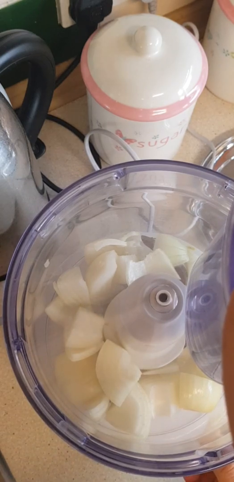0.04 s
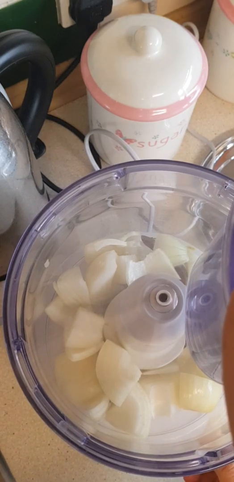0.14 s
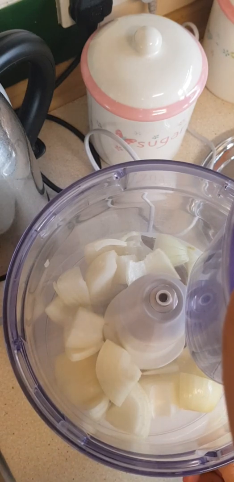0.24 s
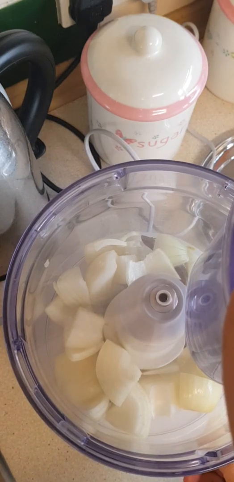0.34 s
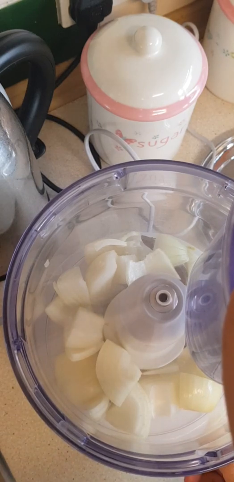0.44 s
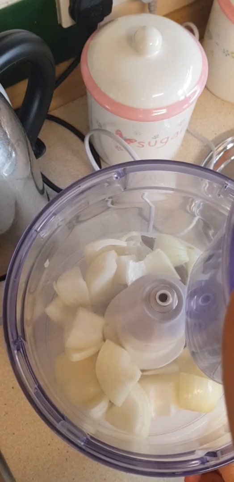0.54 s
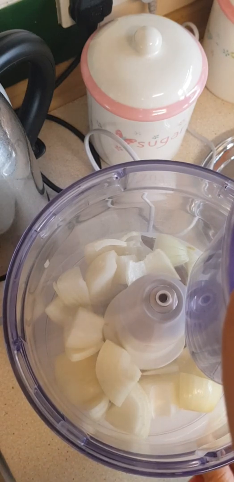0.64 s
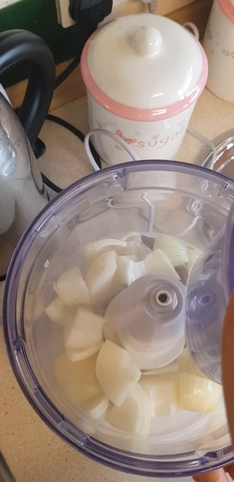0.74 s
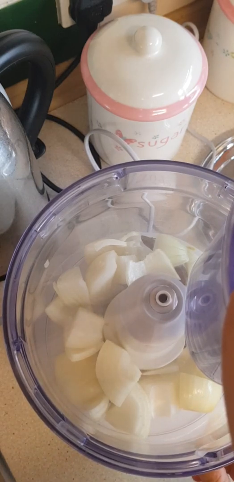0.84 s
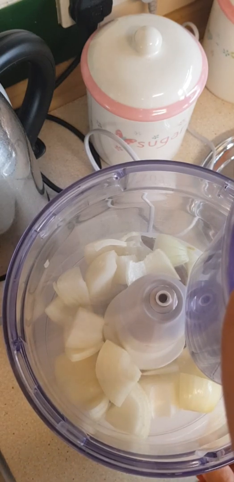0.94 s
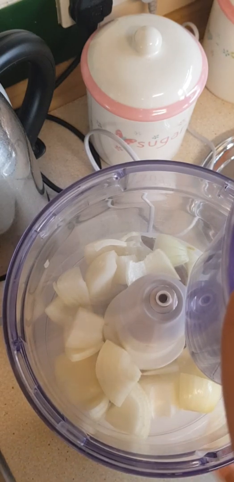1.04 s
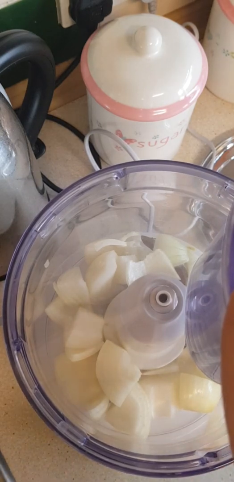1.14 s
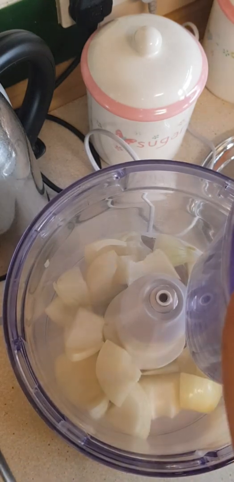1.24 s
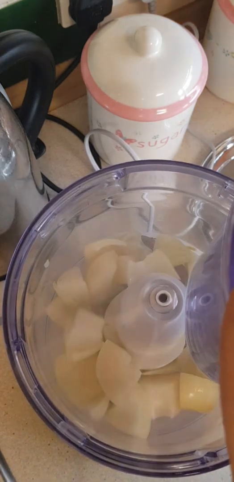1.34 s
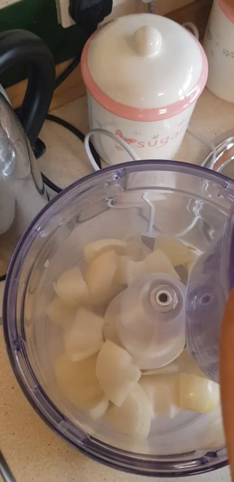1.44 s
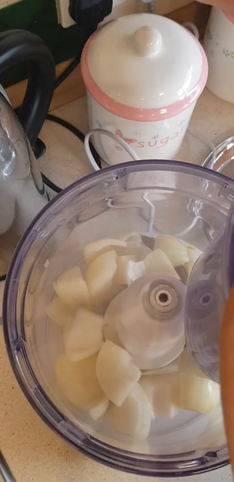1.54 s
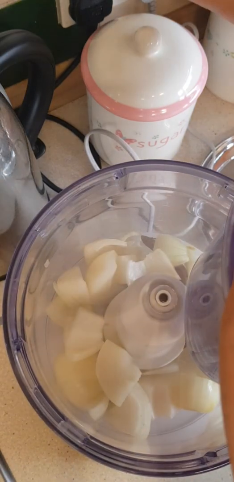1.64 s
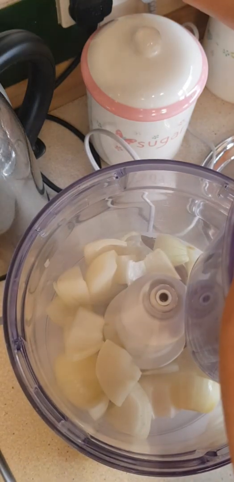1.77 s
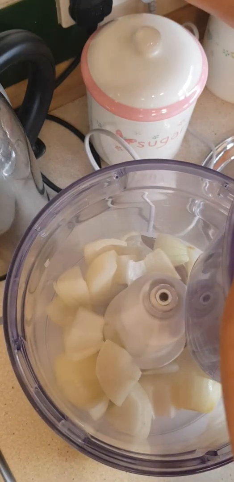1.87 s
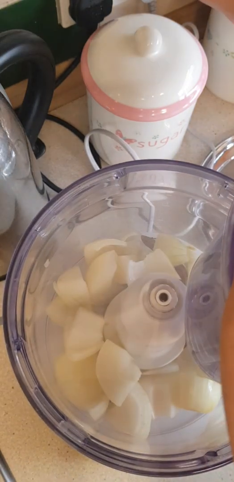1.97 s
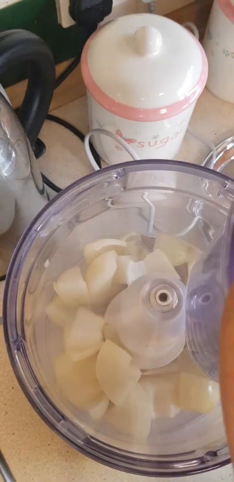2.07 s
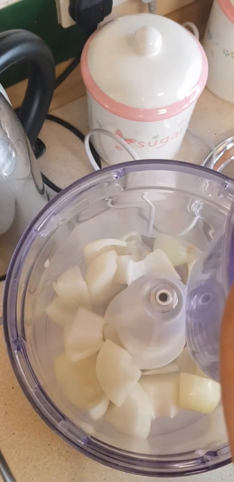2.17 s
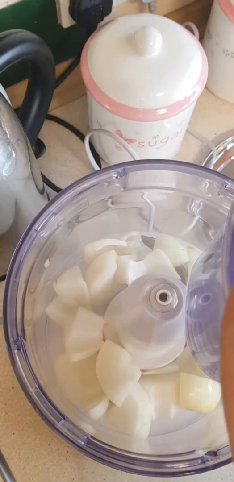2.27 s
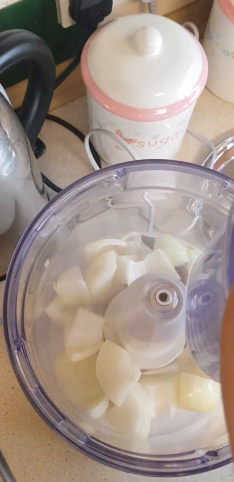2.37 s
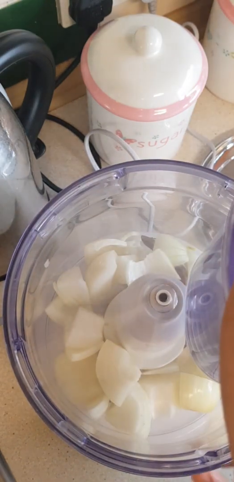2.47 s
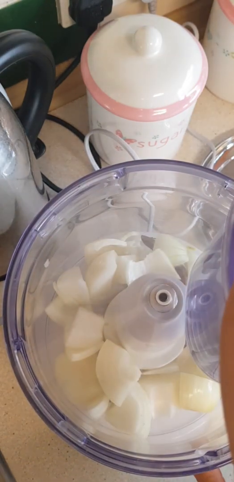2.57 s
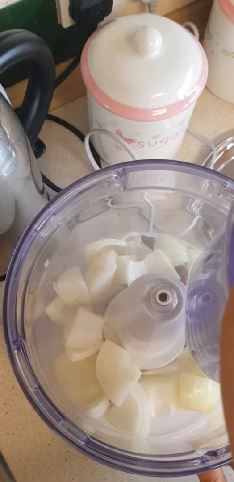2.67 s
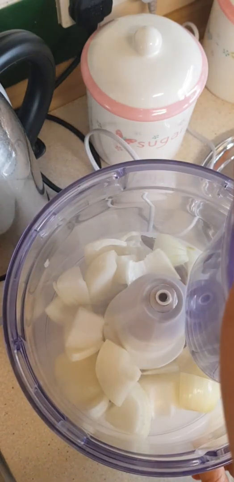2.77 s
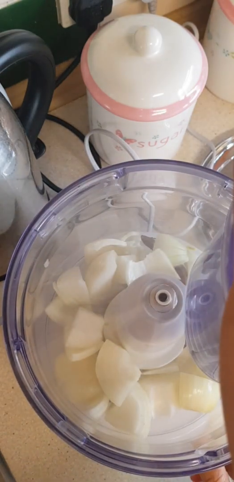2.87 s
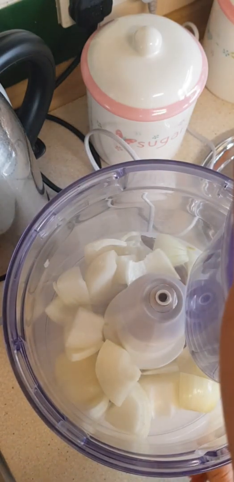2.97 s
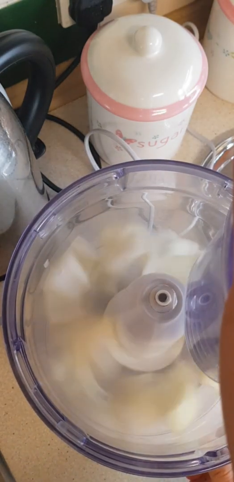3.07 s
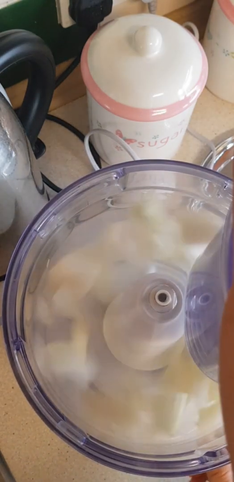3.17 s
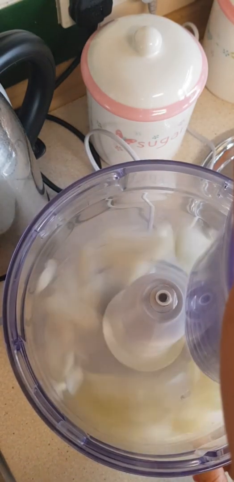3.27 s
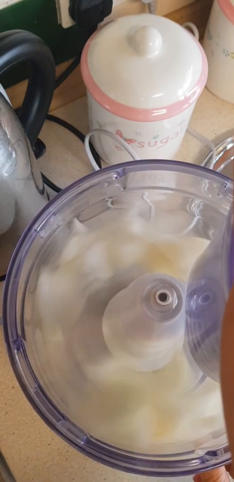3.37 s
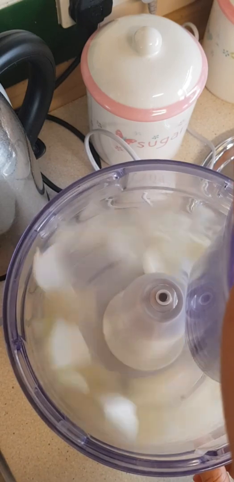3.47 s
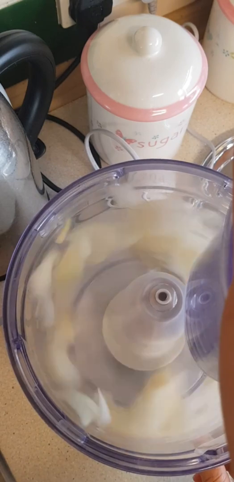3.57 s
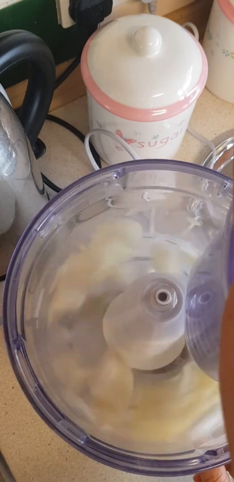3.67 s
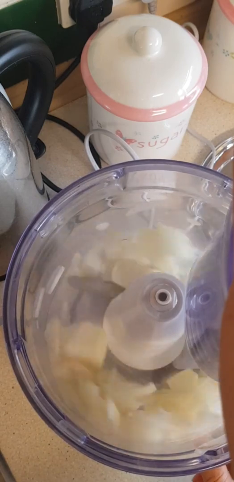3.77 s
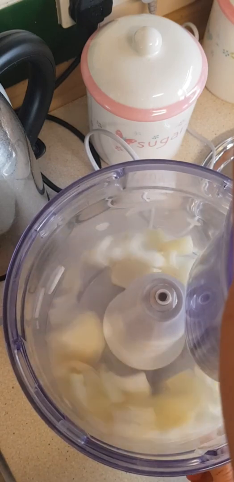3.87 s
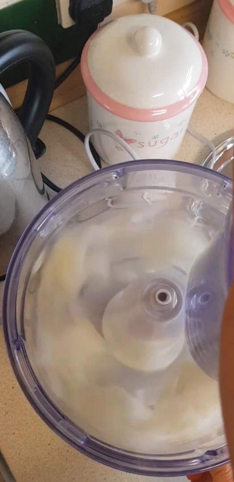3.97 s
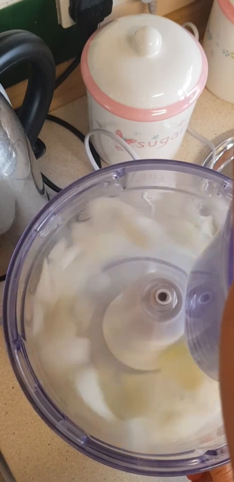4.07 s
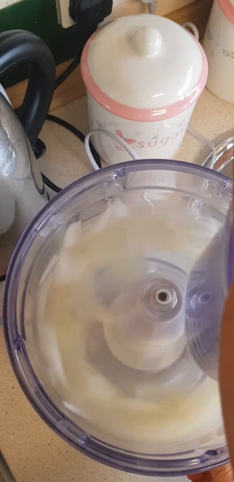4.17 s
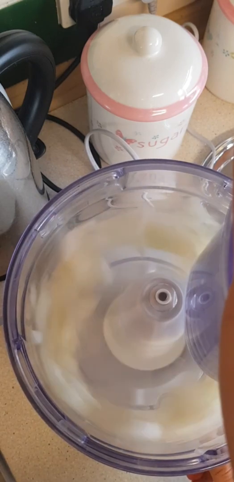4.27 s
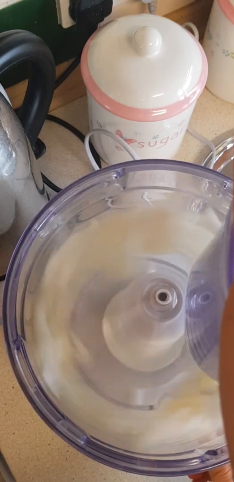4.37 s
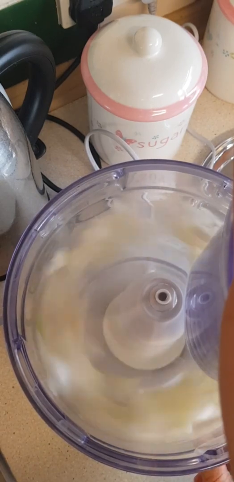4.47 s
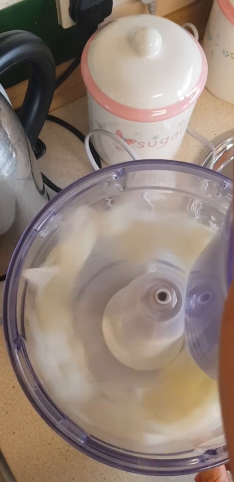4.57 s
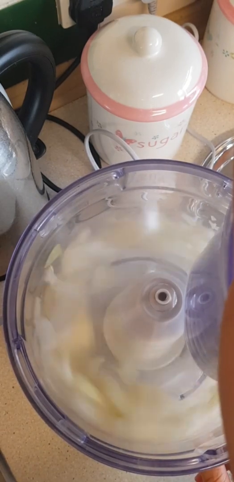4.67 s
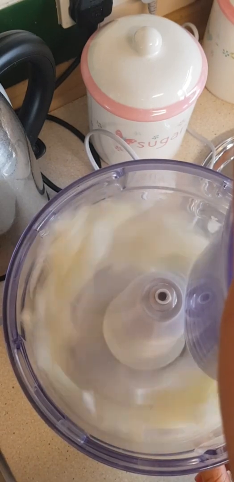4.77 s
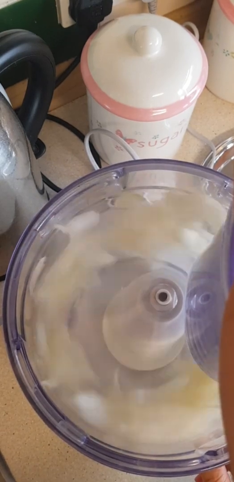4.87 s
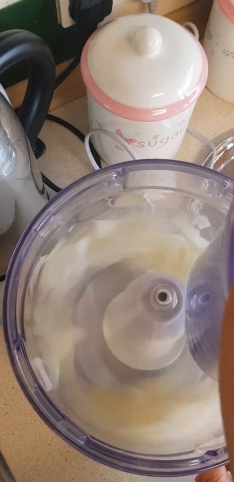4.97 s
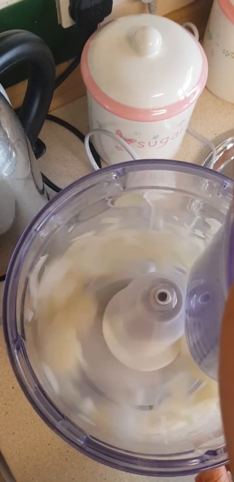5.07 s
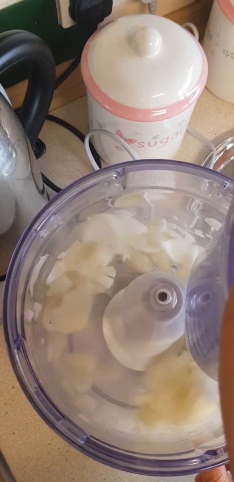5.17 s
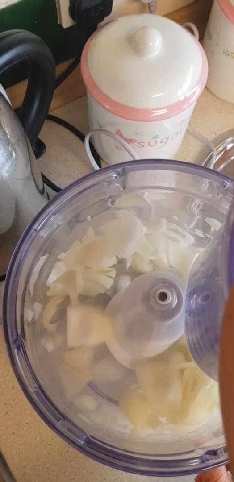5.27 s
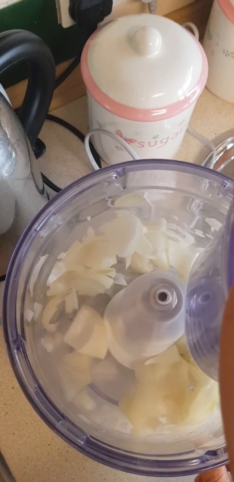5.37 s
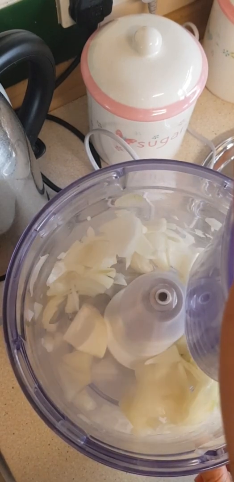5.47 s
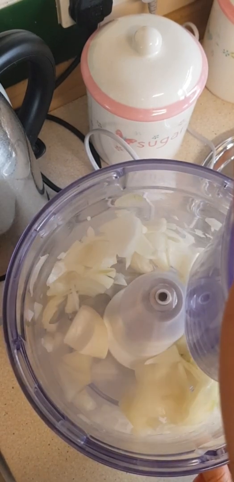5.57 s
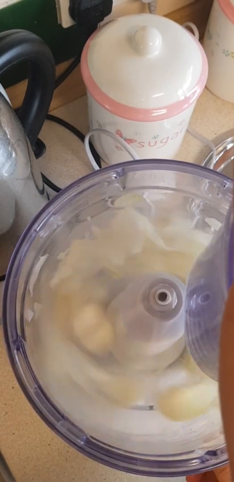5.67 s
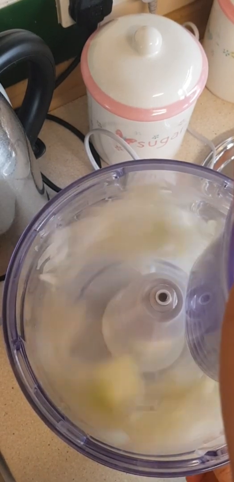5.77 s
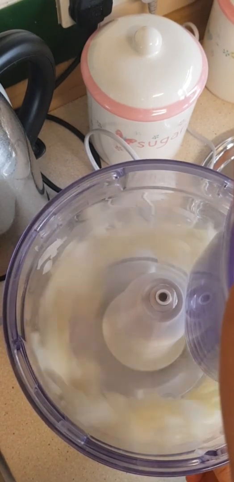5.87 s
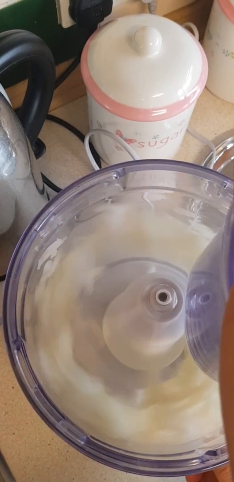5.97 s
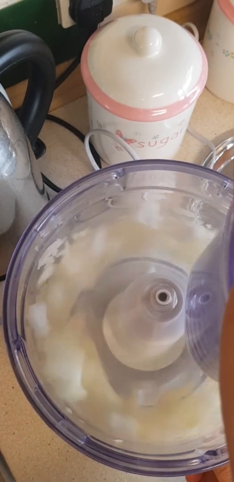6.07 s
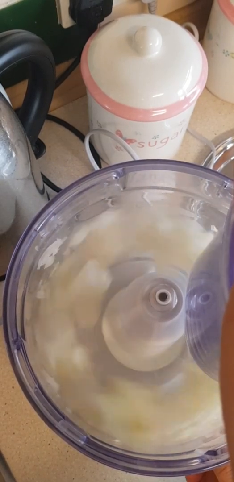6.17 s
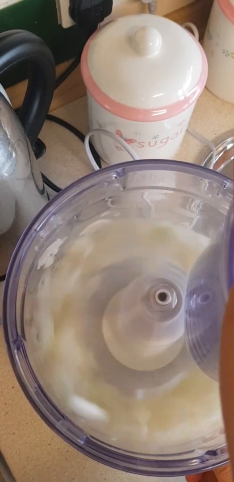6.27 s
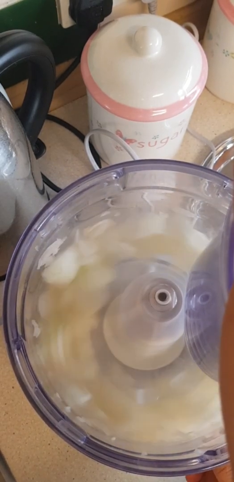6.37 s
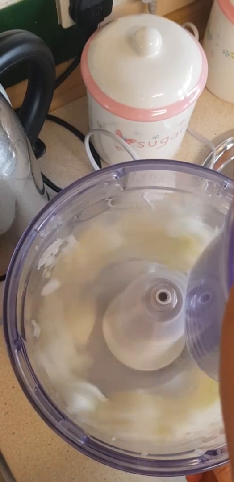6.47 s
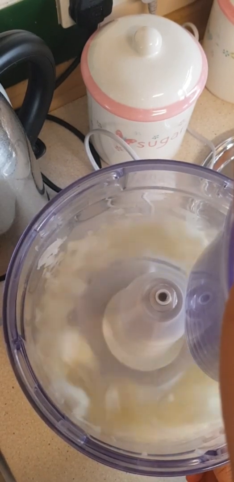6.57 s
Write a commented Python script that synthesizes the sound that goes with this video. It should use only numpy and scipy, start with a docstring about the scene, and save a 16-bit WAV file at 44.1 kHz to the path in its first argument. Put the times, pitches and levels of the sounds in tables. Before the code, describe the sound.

Close in a quiet kitchen, a plastic lid clacks shut before an electric chopper growls in pulses, whining up, thudding, pattering and coasting down.

```python
"""Mini food chopper on a kitchen counter, over faint air noise and appliance hum.
Fingers bump the bowl; the lid slides, clacks onto its rim and snaps shut (filtered noise and chirps).
From 3 s the motor runs in three bursts: an eleven-tooth pinion whines up and coasts down as tones at the
tooth rate, teeth rattle the housing modes, chunks thud, bits patter. A soft note sinks before the third
burst. A small hard room, built from decaying noise, answers."""
import sys
import numpy as np
from scipy import signal
from scipy.fft import rfft, irfft, next_fast_len
from scipy.io import wavfile
from scipy.ndimage import uniform_filter1d

SR = 44100
rng = np.random.default_rng(int(sys.argv[2]) if len(sys.argv) > 2 else 0)


def file_out(sig):
    """Save sig as 16-bit WAV at sys.argv[1]."""
    # one column per channel
    cols = np.atleast_2d(sig).T
    # limit, then scale
    lim = np.clip(cols, -1, 1)
    pcm = np.round(lim * 32767).astype(np.int16)
    wavfile.write(sys.argv[1], SR, pcm)


N = 292486
TIME = np.arange(N) / SR

# All levels are relative: layer gains, filters and the output stage add to them.
# Left-right correlation of diffuse sound: f/Hz, correlation/1
STEREO_CORRELATION = [(60, .9), (300, 0.45), (600, 0.4), (1100, -.25), (3000, 0.05), (15000, 0)]
# Kitchen reverberation: f/Hz, T60/s
ROOM_T60 = [(100, .38), (500, .44), (1500, .41), (5000, .37), (10000, .3), (16000, .24)]
CUTOFF_HZ = 16000

# Background level over time: t/s, level/dB
AIR_LEVEL = [(0, -4.5), (0.6, -1.5), (3.0, -1.5), (5.4, -6), (6.63, -6)]
# Air noise density: f/Hz, level/dB
AIR_COLOUR = [(25, -14), (50, 0), (80, -7), (110, -6), (170, -11), (330, -10.5), (520, -14), (700, -22),
              (1100, -28), (6300, -37), (8400, -46), (11000, -31), (14000, -27.5), (15000, -23)]
AIR_DB = -66
# Appliance hum: f/Hz, level/dB
HUM_TONES = [(239, -67), (358, -76), (431, -81), (528, -77.5)]

# Falling tone as the blade comes to rest
FALL_START_S, FALL_SWELL_S, FALL_START_HZ, FALL_HZ_PER_S = 5.25, .05, 445, 310
FALL_DB, FALL_FADE_DB_PER_S = -57.5, 65

# Finger bumps on the bowl: t/s, level/dB, contact/s, lowpass f/Hz
FINGER_KNOCKS = [(0.205, -67, .02, 3500), (0.728, -51, .006, 1500), (0.99, -52, .014, 1100),
                 (1.620, -43, .003, 7000), (1.945, -50, .007, 1000), (2.66, -60, .02, 1500)]
# Bowl's answer to a dull blow: f/Hz, level/dB
BOWL_COLOUR = [(60, -15), (150, -10), (240, -4), (305, 0), (480, -13), (820, -9.5), (1500, -7), (1900, -15),
               (4500, -19), (8000, -36), (14000, -46)]
# Lid sliding in its groove: start t/s, end t/s, level/dB, swell/s, lowpass f/Hz
LID_SLIDES = [(0.595, 0.664, -43.5, 0.058, 1870), (1.44, 1.56, -65, 0.05, 14500),
              (1.56, 1.755, -68.5, 0.03, 7000)]
# Scrape noise density: f/Hz, level/dB
SCRAPE_COLOUR = [(400, -3), (1000, 2), (1700, 2.5), (3500, 5.5), (6500, 7.5), (9000, -0.5), (15000, -7.5)]
SLIDE_RELEASE_S = .012
# Plastic snaps of lid, latch and switch: t/s, level/dB, bass level/dB, treble level/dB
PLASTIC_SNAPS = [(1.715, -40, 8, -3), (1.785, -12, -2.5, 0.5), (3.008, -41.5, 16.5, 2),
                 (3.044, -20, 12, -14), (3.873, -43, 11, -14.5), (5.653, -37.5, 3.5, -6)]
# Snap spectrum: f/Hz, level/dB
PLASTIC_COLOUR = [(59, -44), (100, -7), (137, -4), (184, -14), (257, -5.5), (375, -11.5), (492, -1.5),
                  (582, -9.5), (633, -7), (1000, -0.5), (2580, -6.5), (3530, -0.5), (8000, -4.5),
                  (15000, -8.5)]
# Spectrum of the lid clacking onto the rim: f/Hz, level/dB
RIM_COLOUR = [(88, -45), (150, -27), (283, 6.5), (401, -4), (459, -1), (787, -5), (1300, -20), (1430, -1.5),
              (1980, -2.5), (3750, -4.5), (4720, -13), (6940, -10.5), (8920, -15), (15000, -20.5)]
SEAT_S, SEAT_DB = 0.657, -32.5

# Large chunks caught by the blade: t/s, level/dB, pitch f/Hz
CHUNK_BLOWS = [(3.043, -15, 750), (3.092, -22, 1500), (3.236, -19, 900), (3.290, -27, 4200),
               (3.412, -22, 1400), (3.486, -28, 4000), (3.605, -29, 3800), (3.907, -25, 1300),
               (3.944, -23, 800), (4.045, -24, 2600), (4.229, -18, 1020), (4.275, -21, 900),
               (4.385, -21, 820), (4.573, -21, 900), (4.648, -23, 950), (4.790, -23, 1350),
               (4.998, -29, 1900), (5.212, -41, 2000), (5.671, -23, 1300), (5.813, -22, 850),
               (5.930, -21, 1020), (5.953, -25, 4400), (6.064, -19, 800), (6.170, -21, 1100),
               (6.335, -21, 880), (6.381, -23, 1500), (6.599, -20, 1000)]
CHUNK_THUD_DB, CHUNK_RING_DB = -10.5, -6.5
KNOCK_WIDTH = 0.12  # bandwidth / pitch

# Switch presses: on t/s, blade engages t/s, off t/s, speed limit before easing/(turns/s), run-up/s,
# coast/s, dry friction/(turns/s), first bite level/dB, flying bits level/dB
MOTOR_BURSTS = [(3.013, 3.038, 3.265, 208, .087, .455, 75, -2.5, 0.5),
                (3.871, 3.903, 4.48, 262, .124, .65, 112, -8, 0.5),
                (5.638, 5.663, 6.7, 276, .135, .65, 112, -10.5, 0.5)]
REFERENCE_TURNS_PER_S = 290
TEETH = 11
EASING_TURNS_PER_S2 = 19  # load eases as the onion gets finer
GRIP_S, BITE_S, BITE_DB = 0.015, 0.076, -27
IDLE_GRIP = 0.4  # share of the noise before the blade engages
COAST_PATTER_DB, SETTLE_S = -14.5, 1  # bits settle without drive

# Heavy lumps landing: t/s, thump level/dB, rocking level/dB
LUMP_THUMPS = [(3.046, -14.5, -41), (3.076, -28, -29), (3.125, -14.5, -50), (3.214, -25, -25),
               (3.392, -20, -30), (3.623, -26.5, -33), (3.705, -22, -28.5), (3.92, -18.5, -29),
               (4.135, -15, -27), (4.389, -15.5, -25.5), (4.499, -20.5, -48), (4.99, -55, -31),
               (5.298, -42, -48), (5.348, -39.5, -42), (5.561, -64.5, -54.5), (5.70, -25, -27),
               (5.809, -18.5, -27), (6.141, -21, -49), (6.548, -27, -41)]
THUMP_S, THUMP_DB, THUMP_ROCK_DB = 0.019, -16.5, -10
FEET_HZ, FEET_T60_S = 55.3, 0.36
# Base resonances: f/Hz, width f/Hz, level/dB
BASE_MODES = [(119, 28, -4), (164.4, 70, -5.5), (232.7, 80, -5), (290, 30, 4), (336, 26, -1.5),
              (430, 182, -13)]
# Base radiation of rotor unbalance: f/Hz, level/dB
UNBALANCE_RADIATION = [(70, -63.5), (100, -49), (125, -38.5), (160, -45), (235, -53), (295, -41)]

# Layer levels at the reference speed; laws are powers of speed for amplitude
ROCK_DB, ROCK_LAW = -56, 0.66
THUD_DB, THUD_LAW = -38.5, 0.97
PATTER_DB, PATTER_LAW = -33, 0.98
RATTLE_DB, RATTLE_LAW = -35, 0.52
BITE_PATTER_DB = -10.5  # patter of the first bite, re its rattle

# Small pieces
PIECES_PER_S, PIECES_DB, PIECE_RANGE_HZ, PIECE_SIZES = 110, -36.5, (680, 4200), 14
PIECE_SLOPE = -.55  # power of pitch for amplitude
# Patter and brush hiss: f/Hz, level/dB
PATTER_COLOUR = [(1060, -11.5), (1750, -8), (2020, 4), (2350, -11), (2690, -0.5), (3260, -5), (3650, -4),
                 (4660, -9), (6470, -9.5), (7200, -12), (7770, -19), (10000, -16.5), (12500, -17.5),
                 (15000, -22.5), (16000, -27.5)]

# Lightly damped gear case resonances: f/Hz, width f/Hz, level/dB
GEAR_CASE_MODES = [(1502, 30, 0), (1600, 90, -3)]
RING_DB, RING_LAW, RING_FLARE_DB = -46.5, .33, -8
# Resonances of housing and bowl: f/Hz, width f/Hz, level/dB
HOUSING_MODES = [(711, 128, -2.5), (785, 78, 2.5), (836, 80, -2), (1002.5, 33, 3), (1078, 120, -3),
                 (1202, 200, -4), (1392, 56, -2.5), (1500, 56, -2), (1810, 240, -7), (1934, 236, -4.5),
                 (2001, 60, -4), (2230, 200, -9), (2450, 77, -5.5), (2730, 130, -8.5), (3040, 70, -10)]
FLUTTER_DB, FLUTTER_HZ = 3.2, 14  # tumbling load damps each housing mode by turns
CREEP_TURNS_PER_S = 13  # near here the teeth stop bouncing and the rattle dies

# Housing radiation of gear tones: f/Hz, level/dB
WHINE_RADIATION = [(200, -60), (500, -50), (700, -33), (810, -31.5), (910, -36.5), (1010, -33),
                   (1130, -28.5), (1250, -34.5), (1390, -28.5), (1520, -27.5), (1700, -36), (1900, -40),
                   (2300, -45), (2550, -36.5), (2820, -36), (3000, -45), (3200, -50), (5500, -50),
                   (6000, -43), (6450, -35.5), (7500, -56), (8400, -47), (9200, -52), (9750, -37.5),
                   (11000, -54), (12700, -45), (14000, -54)]
# Overtones of the tooth rate: multiple/1, level/dB
TOOTH_OVERTONES = [(1, 0), (2, -8.5), (3, -12.5), (4, -14.5)]
SEATED_TURNS_PER_S = 105  # while driven, the whine is weak below this
SURGE_DB, FULL_TORQUE_TURNS_PER_S2 = 2.5, 760
UNLOADED_DB, UNLOADED_FAST_DB = -3, -6  # drop on coasting; further drop at top speed


def from_db(db):
    """Decibels to amplitude gain."""
    return 10 ** (np.asarray(db) / 20)


def rms_one(x):
    """Scale to unit power."""
    return x / np.sqrt(np.mean(x ** 2) + 1e-20)


def at_hz(points, hz):
    """Interpolate a table on a log-frequency axis."""
    f, value = np.transpose(points)
    return np.interp(np.log(np.maximum(hz, 1)), np.log(f), value)


def drift(rate_hz):
    """Slow random wander of spread 1: two-pole lowpass noise, computed at SR / 40."""
    r = np.exp(-80 * np.pi * rate_hz / SR)
    noise = rng.standard_normal(N // 40 + 2002)
    slow = signal.lfilter([1], [1, -2 * r, r * r], noise)[2000:]
    return np.interp(np.arange(N) / 40, np.arange(len(slow)), rms_one(slow))


def cut(x, hz, kind, order=2):
    """Butterworth filter."""
    return signal.sosfilt(signal.butter(order, hz, kind, fs=SR, output="sos"), x + 1e-18)


def coloured(x, spectrum, size=4096):
    """Minimum-phase filter of unit energy with the given spectrum, via the folded cepstrum."""
    magnitude = from_db(at_hz(spectrum, np.fft.rfftfreq(size, 1 / SR)))
    cepstrum = irfft(np.log(magnitude))
    cepstrum[1:size // 2] *= 2
    cepstrum[size // 2 + 1:] = 0
    response = irfft(np.exp(rfft(cepstrum)))
    return signal.oaconvolve(x, response / np.linalg.norm(response))[:N]


def resonate(x, modes, flutter_db=0):
    """Parallel two-pole modes of alternating sign, each with optional own flutter; rms 1."""
    out = 0
    for k, (hz, width_hz, db) in enumerate(modes):
        r = np.exp(-np.pi * width_hz / SR)
        drive = x * from_db(flutter_db * drift(FLUTTER_HZ)) if flutter_db else x
        poles = [1, -2 * r * np.cos(2 * np.pi * hz / SR), r * r]
        mode = (1 - r * r) / 2 * signal.lfilter([1, 0, -1], poles, drive + 1e-18)
        out = out + (-1) ** k * from_db(db) * mode
    return rms_one(out)


def grains(per_s, spread_db):
    """Random impacts of uneven size, at constant mean power."""
    born = rng.random(N) < per_s / SR
    sizes = from_db(spread_db * np.minimum(rng.exponential(1, N), 4)) * rng.choice([-1, 1], N)
    return rms_one(born * sizes / np.sqrt(per_s))


def diffuse(size):
    """Stereo white noise with frequency-dependent correlation, mixed from mid and side."""
    mid, side = rfft(rng.standard_normal((2, size)))
    alike = np.clip(at_hz(STEREO_CORRELATION, np.fft.rfftfreq(size, 1 / SR)), -.99, .99)
    return irfft(np.sqrt(1 + alike) * mid + np.sqrt(1 - alike) * side * [[1], [-1]], size)


def kitchen_echo(early_db, early_s, size=32768):
    """Quick reflections from counter and crockery, then a tail decaying per third-octave band."""
    t, hz = np.arange(size) / SR, np.fft.rfftfreq(size, 1 / SR)
    noise = rfft(diffuse(size))
    band = np.round(3 * np.log2(np.maximum(hz, 200))) / 3  # octaves re 1 Hz
    tail = 0
    for k in np.unique(band):
        tail = tail + irfft(noise * (band == k)) * from_db(-60 * t / at_hz(ROOM_T60, 2 ** k))
    echo = tail * (1 + from_db(early_db) * np.exp(-t / early_s)) * (t > .001)
    return echo / np.linalg.norm(echo, axis=1, keepdims=True)


def placed(x, echo, wet_db, pan_db, lag_ms):
    """Direct sound plus room; positive lag delays left, positive pan favours left."""
    direct = np.array([np.interp(TIME - lag_ms / 1000, TIME, x), x])
    wet = signal.oaconvolve(x[None], echo, axes=1)[:, :N]
    both = direct + from_db(wet_db) * wet
    return both / np.hypot(1, from_db(wet_db)) * from_db([[pan_db / 2], [-pan_db / 2]])


def crack(s, level_db, fade_s, slips):
    """One contact: a bending wave whose highs arrive first, with a share of fading micro-slips."""
    t = TIME[:SR // 40]
    left = np.maximum(1 - t / fade_s, 0)
    wave = np.sin(np.pi * SR * fade_s * left ** 2 / 2)  # chirp from SR / 2 down to 0 Hz
    slip_noise = slips * rng.standard_normal(len(t)) * np.exp(-t / fade_s)
    out, at = np.zeros(N), round(s * SR)
    out[at:at + len(t)] = from_db(level_db) * (wave + slip_noise)
    return out


def background():
    """Still kitchen air as diffuse noise, and an appliance's hum as wavering sines."""
    sides = diffuse(next_fast_len(N))[:, :N]
    air = rms_one(np.array([coloured(side, AIR_COLOUR) for side in sides]))
    hum = sum(from_db(db + 0.79 * drift(1.7)) * np.sin(2 * np.pi * hz * TIME) for hz, db in HUM_TONES)
    level_db = np.interp(TIME, *np.transpose(AIR_LEVEL))
    return (from_db(AIR_DB) * air + hum) * from_db(level_db) * from_db([[1], [-1]])


def falling_tone():
    """A soft sine of wavering level that sinks in pitch and fades."""
    t = np.clip(TIME - FALL_START_S, 0, 1)
    level_db = FALL_DB - FALL_FADE_DB_PER_S * t + 0.67 * drift(23)
    phase = 2 * np.pi * np.cumsum(FALL_START_HZ - FALL_HZ_PER_S * t) / SR
    return np.minimum(t / FALL_SWELL_S, 1) * from_db(level_db) * np.sin(phase)


def finger_knocks():
    """Soft fingertips bump the bowl: each contact's noise swells and eases off."""
    touches = 0
    for s, db, contact_s, lowpass_hz in FINGER_KNOCKS:
        phase = np.clip((TIME - s) / contact_s, 0, 30)
        contact = phase * np.exp(1 - phase) * rng.standard_normal(N)
        touches = touches + from_db(db) * cut(contact, lowpass_hz, "low")
    return coloured(touches, BOWL_COLOUR)


def lid_slide():
    """Plastic scrapes on plastic in dense tiny slips; each push swells, holds and stops."""
    slips, out = coloured(grains(7200, spread_db=-4.0), SCRAPE_COLOUR), 0
    for start, end, db, swell_s, lowpass_hz in LID_SLIDES:
        swell = np.clip((TIME - start) / swell_s, 0, 1)
        release = np.exp(-np.clip((TIME - end) / SLIDE_RELEASE_S, 0, 20))
        out = out + from_db(db) * swell * release * cut(slips, lowpass_hz, "low")
    return out


def snaps():
    """The lid clacks onto the rim; catches spring home, each with its own thump and tick."""
    force = 0
    for s, db, bass_db, treble_db in PLASTIC_SNAPS:
        burst = crack(s, db, fade_s=.0014, slips=.08)
        bass, treble = cut(burst, 1800, "low", order=1), cut(burst, 1800, "high", order=1)
        force = force + from_db(bass_db) * bass + from_db(treble_db) * treble
    seat = crack(SEAT_S, SEAT_DB, fade_s=.004, slips=.08)
    return coloured(force, PLASTIC_COLOUR) + coloured(seat, RIM_COLOUR)


def chunk_hits():
    """The blade flings a chunk at the wall: a dull thud and a short knock at the piece's pitch."""
    blows, rings = 0, 0
    for s, db, hz in CHUNK_BLOWS:
        blow = crack(s, db, fade_s=.004, slips=.4)
        blows = blows + blow
        rings = rings + blow.std() * resonate(blow, [(hz, hz * KNOCK_WIDTH, 0)])
    return from_db(CHUNK_THUD_DB) * coloured(blows, BOWL_COLOUR) + from_db(CHUNK_RING_DB) * rings


def motor():
    """Speed nears its limit while driven, then drag and friction slow it; also grip, bite, bits gains."""
    speed, grip, bite, bits = np.zeros((4, N))
    for on, engage, off, top, run_up_s, coast_s, friction, bite_db, bits_db in MOTOR_BURSTS:
        held_s = np.clip(TIME - on, 0, off - on)
        driven = top * (1 - np.exp(-held_s / run_up_s)) + EASING_TURNS_PER_S2 * held_s
        coasted_s, engaged_s = np.maximum(TIME - off, 0), np.maximum(TIME - engage, 0)
        turning = (driven + friction) * np.exp(-coasted_s / coast_s) - friction
        gripped = np.minimum(engaged_s / GRIP_S, 1)
        leads = turning > speed + 1e-9  # the faster burst sets the state
        speed = np.where(leads, turning, speed)
        grip = np.where(leads, np.maximum(gripped, IDLE_GRIP), grip)
        settling_db = COAST_PATTER_DB * (1 - np.exp(-coasted_s / SETTLE_S))
        bits = np.where(leads, from_db(bits_db + settling_db), bits)
        bite = bite + from_db(BITE_DB + bite_db) * gripped * np.exp(-engaged_s / BITE_S)
    return speed, grip, bite, bits


def feet_rocking(pace, grip):
    """Low noise rocks the base at the resonance of its feet."""
    sway = resonate(cut(rng.standard_normal(N), 61, "low"), [(FEET_HZ, 4.5, 0)])
    return from_db(ROCK_DB) * grip * pace ** ROCK_LAW * sway


def lump_thumps():
    """Each lump lands as a short, soft shove: the base resonates and sways on its rubber feet."""
    shove, sway = 0, 0
    for s, db, rock_db in LUMP_THUMPS:
        t = np.maximum(TIME - s, 0)
        shove = shove + from_db(db) * (t > 0) * np.exp(-np.minimum(t / THUMP_S, 20))
        swing = np.sin(2 * np.pi * FEET_HZ * t) * (1 - np.exp(-t / THUMP_S))
        sway = sway + from_db(rock_db - 60 * t / FEET_T60_S) * swing
    force = shove * rng.standard_normal(N)
    thump = from_db(THUMP_DB) * force.std() * resonate(force, BASE_MODES)
    return thump, from_db(THUMP_ROCK_DB) * sway


def base_thuds(speed, pace, grip):
    """Random impacts excite the base, denser and louder with speed."""
    thuds = resonate(grains(200 + 2 * speed, spread_db=2.5), BASE_MODES)
    return from_db(THUD_DB) * grip * pace ** THUD_LAW * thuds


def rotor_hum(turns, speed, waver_db):
    """Rotor unbalance shakes the base once a turn, most where it meets a resonance."""
    level_db = at_hz(UNBALANCE_RADIATION, speed) + waver_db * drift(16)
    return np.sin(2 * np.pi * turns) * from_db(level_db) * np.minimum(speed / 70, 1)


def small_pieces(pace):
    """Small pieces hit the wall at random, each at its own pitch; a faster blade throws more."""
    pitches_hz = np.geomspace(*PIECE_RANGE_HZ, num=PIECE_SIZES)
    hits = grains(PIECES_PER_S * (.2 + pace), spread_db=3.0)
    dealt = rng.integers(0, PIECE_SIZES, N)  # size class of each hit
    out = 0
    for k, hz in enumerate(pitches_hz):
        knock = resonate(hits * (dealt == k), [(hz, hz * KNOCK_WIDTH, 0)])
        out = out + (hz / pitches_hz[0]) ** PIECE_SLOPE * knock
    return rms_one(out)


def wall_patter(speed):
    """Bits strike the wall as grains over brush hiss; more grains with speed."""
    spray = grains(150 + 6 * speed, spread_db=3.5) + 1.05 * rng.standard_normal(N)
    return rms_one(coloured(spray, PATTER_COLOUR))


def tooth_meshes(turns):
    """One unit impulse per tooth passing."""
    return np.diff(np.floor(turns * TEETH), prepend=0)


def gear_rattle(turns, speed, loose_db, rub, throb_db, dull_hz, bright_db):
    """Each tooth strikes the housing with its own force; faster teeth strike brighter."""
    uneven = rng.standard_normal(N) * from_db(loose_db * rng.standard_normal(N))
    blows = tooth_meshes(turns) * uneven / np.sqrt(speed + 5)
    force = (rms_one(blows) + rub * rng.standard_normal(N)) * from_db(throb_db * drift(30))
    soft, hard = cut(force, dull_hz, "low", order=5), cut(force, dull_hz, "high", order=5)
    hard_gain = from_db(bright_db * (speed / speed.max() - 0.97))
    return resonate(soft + hard * hard_gain, HOUSING_MODES, FLUTTER_DB)


def gear_ring(turns, pace, grip, whine):
    """Teeth tap the gear case at its fixed pitches; it flares when the whine glides through."""
    taps = tooth_meshes(turns) * rng.standard_normal(N) * grip * pace ** RING_LAW / np.sqrt(pace + .02)
    flare = whine.std() * resonate(whine, GEAR_CASE_MODES[:1])
    return from_db(RING_DB) * resonate(taps, GEAR_CASE_MODES) + from_db(RING_FLARE_DB) * flare


def gear_whine(turns, speed, waver_db, smear_rad):
    """Tones at the tooth rate, broken up by backlash; louder when driven than when coasting."""
    mesh = 2 * np.pi * turns * TEETH
    coasting = uniform_filter1d((np.gradient(speed) < 0) * 1., size=2000)
    tones = 0
    for k, db in TOOTH_OVERTONES:
        level_db = at_hz(WHINE_RADIATION, k * TEETH * speed) + db + waver_db * drift(40)
        tones = tones + from_db(level_db) * np.sin(round(k) * mesh + smear_rad * drift(55))
    seated = coasting + (1 - coasting) * np.minimum(speed / SEATED_TURNS_PER_S, 1) ** 4
    unloaded_db = coasting * (UNLOADED_DB + UNLOADED_FAST_DB * (speed / speed.max()) ** 3)
    return tones * seated * np.minimum(speed / 45, 1) * from_db(unloaded_db)


def chopper():
    """Rotor speed sets tooth pitches, impact rates and levels; the first bite adds a burst of rattle."""
    speed, grip, bite, bits = motor()
    turns = np.cumsum(speed * (1 + .003 * drift(12))) / SR
    pace = speed / REFERENCE_TURNS_PER_S

    thump, sway = lump_thumps()
    out = (feet_rocking(pace, grip) + sway) * from_db([[1], [-1]])
    base = base_thuds(speed, pace, grip) + thump + rotor_hum(turns, speed, waver_db=3)
    out = out + placed(base, kitchen_echo(early_db=3, early_s=.008), wet_db=-9, pan_db=4, lag_ms=.12)

    knocking = from_db(PIECES_DB) * grip * bits * pace ** PATTER_LAW * small_pieces(pace)
    echo = kitchen_echo(early_db=14, early_s=.003)
    out = out + placed(knocking, echo, wet_db=1, pan_db=3.2, lag_ms=.15)

    torque = np.clip(np.gradient(speed) * SR / FULL_TORQUE_TURNS_PER_S2, 0, 1)
    whine = from_db(SURGE_DB * torque) * grip * gear_whine(turns, speed, waver_db=2.5, smear_rad=1.0)
    echo = kitchen_echo(early_db=9, early_s=.006)
    out = out + placed(whine, echo, wet_db=-1, pan_db=3.2, lag_ms=.13)
    ring = gear_ring(turns, pace, grip, whine)
    echo = kitchen_echo(early_db=6, early_s=.006)
    out = out + placed(ring, echo, wet_db=-3, pan_db=3.2, lag_ms=.1)

    bounce = speed / (speed + CREEP_TURNS_PER_S)
    rattle_gain = from_db(RATTLE_DB) * grip * pace ** RATTLE_LAW * bounce + bite
    patter_gain = from_db(PATTER_DB) * grip * bits * pace ** PATTER_LAW + from_db(BITE_PATTER_DB) * bite
    # uneven tumbling load; four sides of the bowl radiate by their own paths
    tumble, sides = drift(35), np.arange(4)
    for side in sides:
        rattle = gear_rattle(turns, speed, loose_db=3.5, rub=.4, throb_db=3.0, dull_hz=1740, bright_db=16)
        rattle = rattle_gain * from_db(1.3 * tumble) * rattle
        patter = patter_gain * from_db(0.88 * tumble) * wall_patter(speed)
        echo = kitchen_echo(early_db=15.0, early_s=0.0036)
        lag_ms = 0.063 + 0.028 * side
        bowl = placed(rattle + patter, echo, wet_db=3.0, pan_db=2.5, lag_ms=lag_ms)
        out = out + bowl / np.sqrt(len(sides))
    return out


def scene():
    """Background, handling, snaps and chopper, all close to the microphones in one room."""
    echo = kitchen_echo(early_db=10, early_s=0.0025)
    handling = falling_tone() + finger_knocks() + lid_slide() + chunk_hits()
    handling = placed(handling, echo, wet_db=4, pan_db=3, lag_ms=.2)
    clicks = placed(snaps(), echo, wet_db=9.0, pan_db=5.0, lag_ms=-0.027)
    return background() + handling + clicks + chopper()


def record(dry):
    """Round the peaks with tanh; cut the top with an elliptic lowpass."""
    rounded = 2.126 * np.tanh(dry / 0.74)
    return signal.sosfilt(signal.ellip(10, .2, 80, CUTOFF_HZ, fs=SR, output="sos"), rounded)


dry = scene()
out = record(dry)
file_out(out)
```